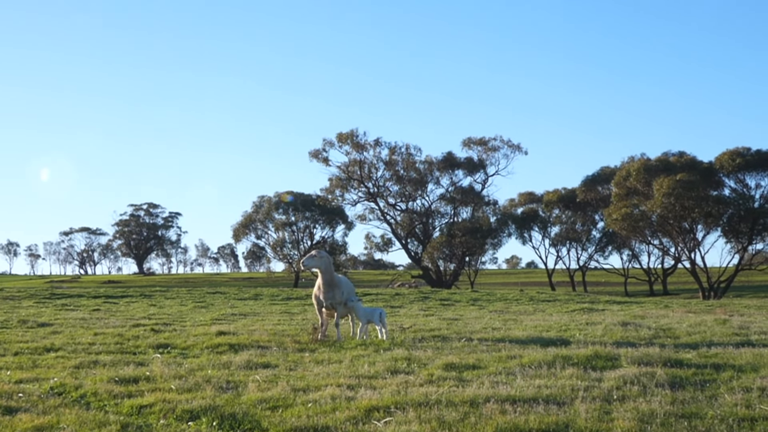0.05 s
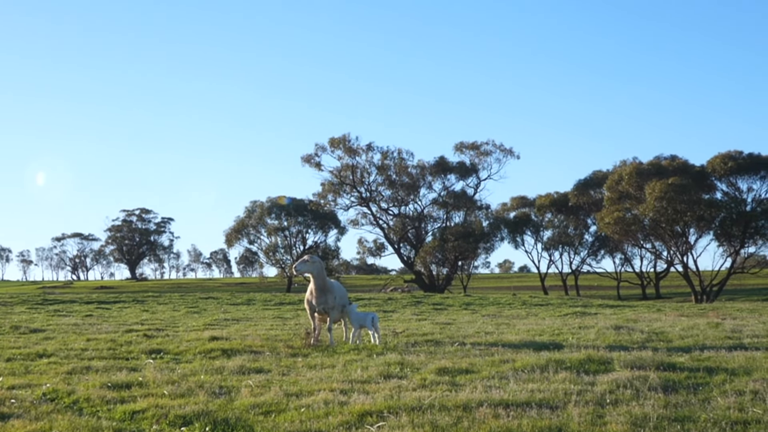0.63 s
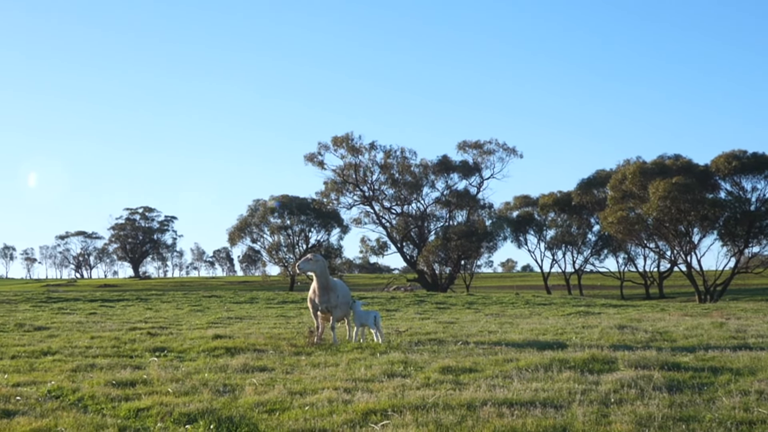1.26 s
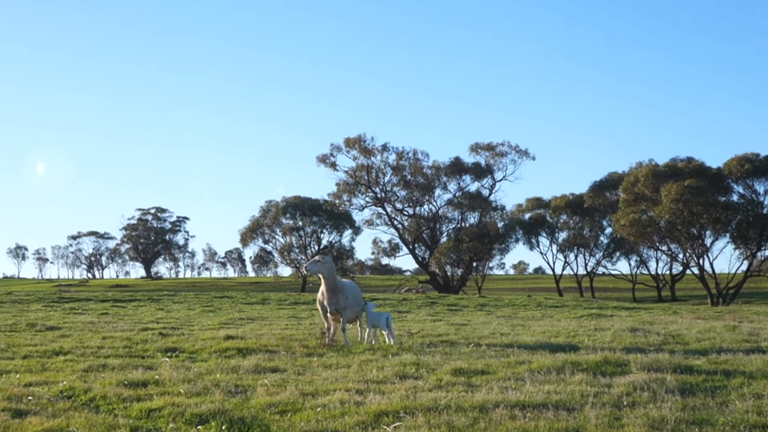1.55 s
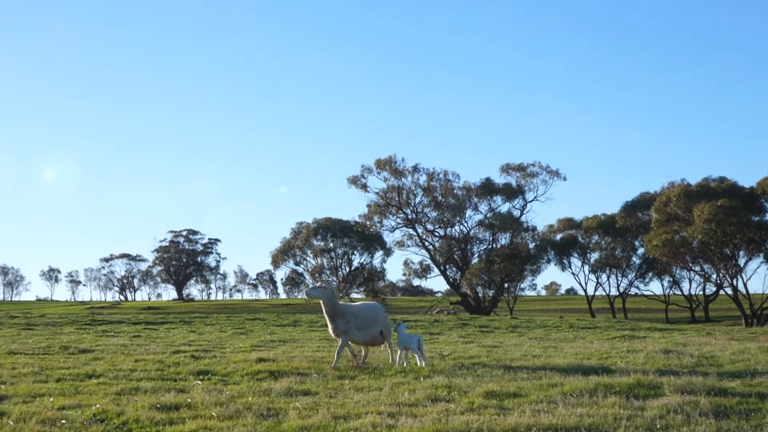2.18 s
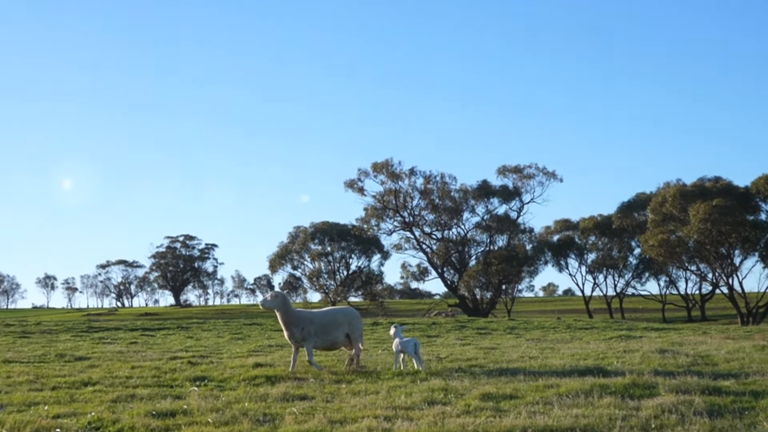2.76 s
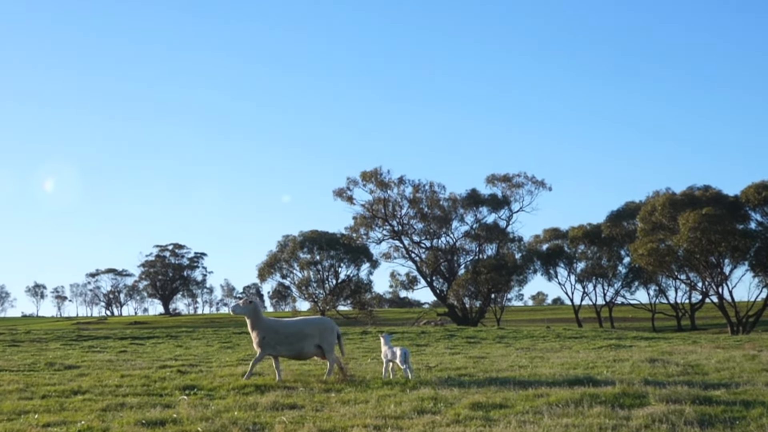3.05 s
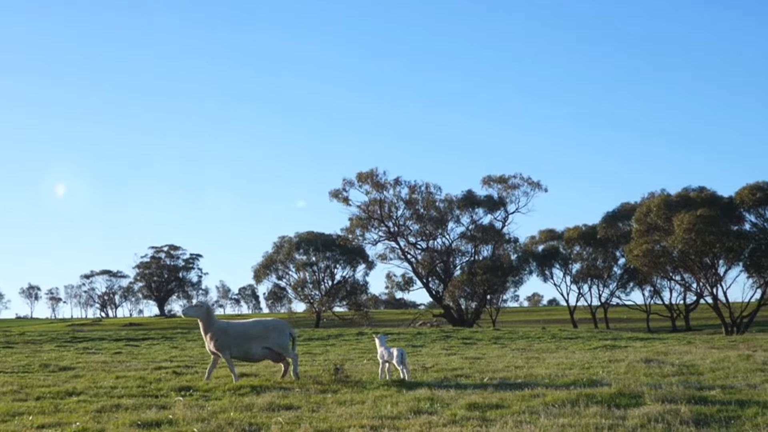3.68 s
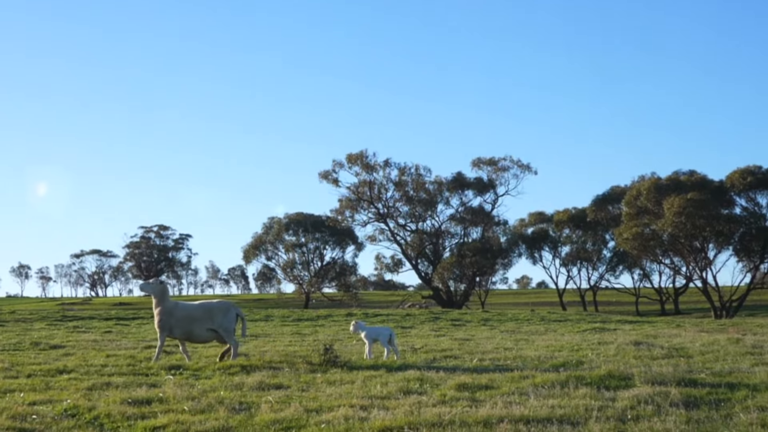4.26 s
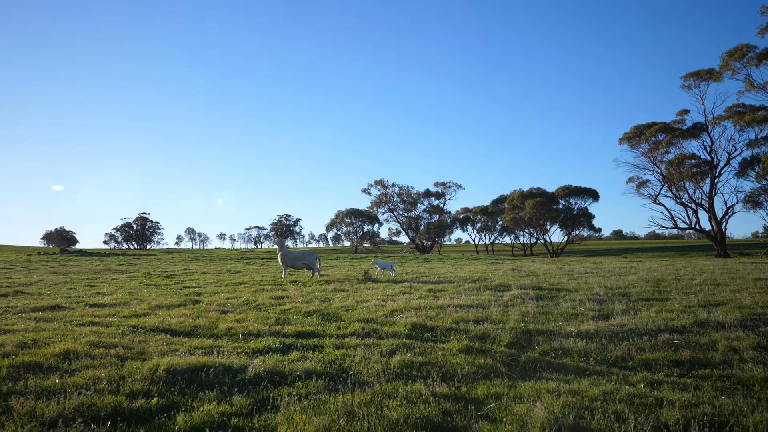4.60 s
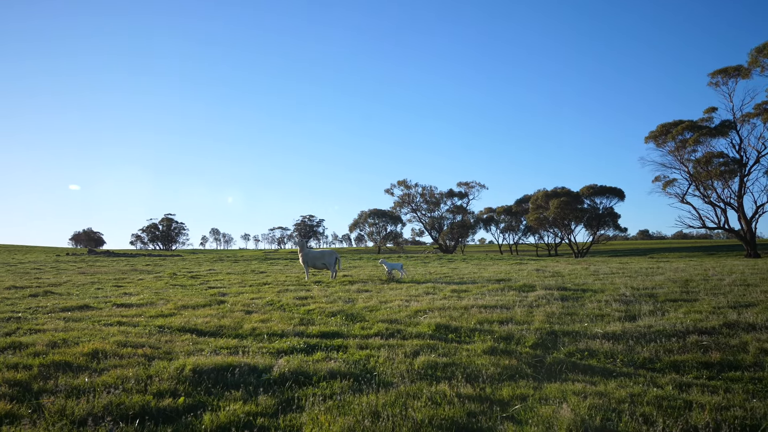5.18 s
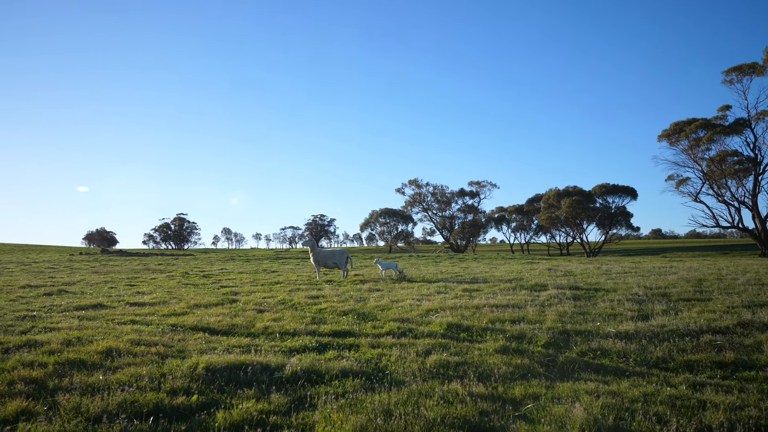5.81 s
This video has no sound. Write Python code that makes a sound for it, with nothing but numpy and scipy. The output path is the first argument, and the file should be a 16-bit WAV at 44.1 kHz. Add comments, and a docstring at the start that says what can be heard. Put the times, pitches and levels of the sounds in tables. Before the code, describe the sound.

A lamb calls faintly, a low rasping bleat follows, then a ewe gives one loud quavering bleat, with light wind on the microphone.

```python
"""Ewe and lamb in a paddock

A lamb calls thinly, a low rasping call follows, then the ewe bleats loudly. Each voice is vocal-fold
pulses ringing a throat that changes shape; squeezes of the ewe's larynx make her quaver.
Wind buffets the microphone and stirs the grass, a far bird whistles, a hand-held camera whines and clicks."""
import sys
import numpy as np
from scipy import signal
from scipy.fft import rfft, irfft
from scipy.io import wavfile

SR = 44100
rng = np.random.default_rng(int(sys.argv[2]) if len(sys.argv) > 2 else 0)


def transcribe(signal):
    """Save signal, clipped to [-1, 1], as a 16-bit WAV file at the path in sys.argv[1]."""
    frames = np.atleast_2d(signal).T
    limited = np.clip(frames, -1, 1)
    pcm = np.round(limited * 32767).astype(np.int16)
    wavfile.write(sys.argv[1], SR, pcm)


N = 266452
TIME = np.arange(N) / SR
BAND_LIMIT_HZ = 15000


def amp(db):
    """dB to gain."""
    return 10 ** (np.asarray(db) / 20)


def unit(x):
    """Scale to rms 1."""
    return x / np.sqrt(np.mean(x ** 2) + 1e-20)


def along(rows, at):
    """Table columns, interpolated linearly over the first."""
    axis, *columns = np.transpose(rows)
    return [np.interp(at, axis, column) for column in columns]


def across(points, hz):
    """Table interpolated over log frequency."""
    f, value = np.transpose(points)
    return np.interp(np.log(hz + 1), np.log(f + 1), value)


def placed(start_s, sound):
    """Full-length track with the sound at start_s."""
    return np.pad(sound, (max(round(start_s * SR), 0), N))[:N]


def panned(x, left_db):
    """Mono to stereo, left_db louder on the left."""
    return x * amp([[left_db / 2], [-left_db / 2]])


def wander(count, rate_hz):
    """Smooth random curve, rms 1, rolling off at rate_hz."""
    hz = np.fft.rfftfreq(count, 1 / SR)
    return unit(irfft(rfft(rng.standard_normal(count)) * np.exp(-(hz / rate_hz) ** 2), count))


def swells(rows):
    """Gain curve of Gaussian swells, summed in power."""
    return np.sqrt(sum((amp(db) * np.exp(-((TIME - s) / half_s) ** 2)) ** 2 for s, half_s, db in rows))


def ring(x, spectrum, size=4096):
    """Minimum-phase filter: each pulse rings after it strikes."""
    log_gain = np.log(amp(across(spectrum, abs(np.fft.fftfreq(size, 1 / SR)))))
    taps = np.fft.ifft(np.exp(np.conj(signal.hilbert(log_gain)))).real
    return signal.oaconvolve(x, taps[:size // 2])[:len(x)]


def glide(start_s, length_s, first_hz, last_hz, db, waver=0):
    """Sliding tone, faded in and out."""
    count = int(length_s * SR)
    hz = np.linspace(first_hz, last_hz, count) * (1 + waver * wander(count, 220))
    tone = np.sqrt(2) * np.sin(2 * np.pi * np.cumsum(hz) / SR)
    return placed(start_s, amp(db) * tone * signal.windows.tukey(count, .8))


# Left-right coherence: f/Hz, coherence/0-1
MIC_COHERENCE = [(30, .8), (120, .95), (500, .85), (2000, .8), (6000, .8), (9000, .72), (13000, .55)]
def noise(spectrum):
    """Coloured noise, rms 1, at two close microphones."""
    hz = np.fft.rfftfreq(N, 1 / SR)
    mid, side = rfft(rng.standard_normal((2, N))) * amp(across(spectrum, hz))
    coherence = np.clip(across(MIC_COHERENCE, hz), 0, 1)
    side = side * np.sqrt((1 - coherence) / (1 + coherence))
    return unit(irfft([mid + side, mid - side], N))


# Hiss spectrum: f/Hz, level/dB
HISS_SPECTRUM = [(30, -30), (120, -5), (260, -10), (480, -8), (720, -16), (1100, -13), (1400, -18),
                 (2500, -20), (5000, -21), (9000, -21.5), (14000, -24), (15400, -32)]
def hiss(level_db=-65.06):
    """Steady noise floor."""
    return noise(HISS_SPECTRUM) * amp(level_db)


# Breeze swells: t/s, half length/s, peak/dB
BREEZE_SWELLS = [(.85, 0.21, -70), (4.68, 0.38, -57), (5.76, 0.31, -62)]
# Rustle spectrum: f/Hz, level/dB
GRASS_SPECTRUM = [(100, -6.5), (250, -1.5), (480, 0), (750, -2.5), (1200, -1.5), (2000, -3), (3000, -11),
                  (6000, -18.5), (15000, -43)]
def grass(calm_db=-72.5):
    """Breeze swelling in the grass."""
    return noise(GRASS_SPECTRUM) * np.hypot(swells(BREEZE_SWELLS), amp(calm_db))


# Gusts: t/s, half length/s, relative peak/dB
WIND_GUSTS = [(.022, 0.019, -37), (.1, 0.081, -45.5), (.165, 0.021, -39), (.26, 0.11, -51),
              (.625, 0.011, -50.5), (.71, 0.03, -49.5), (.768, 0.034, -45), (.89, 0.036, -44),
              (.995, 0.014, -43), (1.12, 0.22, -47.5), (1.295, 0.02, -43.5), (1.44, 0.036, -51),
              (1.53, 0.025, -53), (1.82, 0.022, -52.5), (2.65, .3, -62), (4.58, .018, -52),
              (5.105, 0.027, -43.5), (5.11, 0.17, -55), (5.81, 0.086, -53)]
# Buffeting spectrum: f/Hz, level/dB
BUFFET_SPECTRUM = [(20, -43), (45, -30.5), (85, -4.5), (125, 1.5), (180, -5), (270, -25), (400, -38.5),
                   (650, -55), (1100, -89)]
# Flutter added by hard gusts: f/Hz, level/dB
FLUTTER_SPECTRUM = [(50, -28), (130, 0), (200, 9.5), (300, 0.5), (420, -24), (800, -53), (2000, -84)]
def wind(buffet_db=-1.5, flutter_db=-42, lumps_db=2.15):
    """Lumpy gusts striking the microphone, brighter when hard."""
    light_wind = amp(-65.5 + 3.2 * wander(N, rate_hz=11))
    force = np.hypot(swells(WIND_GUSTS), light_wind)
    buffet = noise(BUFFET_SPECTRUM) * force * amp(buffet_db)
    flutter = noise(FLUTTER_SPECTRUM) * amp(flutter_db) * (force / force.max()) ** 2
    lumps = amp(lumps_db * wander(N, rate_hz=30))
    return panned((buffet + flutter) * lumps, left_db=1.6)


# Motor partials: f/Hz, level/dB
WHINE_PARTIALS = [(959.5, -68), (1919, -78.5), (2878, -75.5), (4797, -81)]
# Motor envelope: t/s, gain/dB
WHINE_ENVELOPE = [(0, -11), (1.1, -8), (1.4, -5.5), (2.2, -8.5), (2.7, -3.5), (3.3, -3.5), (3.9, -10.5),
                  (4.9, -13), (6.04, -25)]
def motor_whine(drift_s=.00096, flicker_db=3.3):
    """Faint camera motor, unsteady in pitch and level."""
    motor_time = TIME + np.cumsum(drift_s * wander(N, rate_hz=20.74)) / SR
    whine = sum(amp(db) * np.sqrt(2) * np.sin(2 * np.pi * hz * motor_time) for hz, db in WHINE_PARTIALS)
    return whine * amp(along(WHINE_ENVELOPE, TIME)[0] + flicker_db * wander(N, rate_hz=30))


# Camera body modes: f/Hz, level/dB, T60/s
BODY_MODES = [(2305, -1.5, 0.0096), (3520, -1.5, 0.0023), (4800, 0.5, 0.0036), (7200, -8, 0.0034),
              (9020, -4.5, 0.0033), (11050, -4.5, 0.0031), (12450, -7.5, 0.0023)]
def click(start_s, peak_db, tilt_db_per_octave):
    """A tick rings the camera's small plastic body."""
    t = np.arange(SR // 20) / SR
    tick = 0
    for k, (hz, db, t60_s) in enumerate(BODY_MODES):
        decay = amp(db + tilt_db_per_octave * np.log2(hz) - 60 * t / t60_s)
        tick += (-1) ** k * decay * np.sin(2 * np.pi * hz * t)
    return placed(start_s, amp(peak_db) * tick / abs(tick).max())


# Body clicks: t/s, peak/dB, tilt/(dB/octave)
BODY_CLICKS = [(1.4393, -17.5, 4.5), (1.574, -45.5, -19), (3.616, -39.5, -5.5), (3.86, -31, -6)]
# Grip knock: t/s, length/s, first f/Hz, last f/Hz, level/dB
GRIP_KNOCKS = [(3.848, .018, 490, 540, -48)]
# Finger slides: t/s, half length/s, peak/dB
FINGER_SLIDES = [(1.47, 0.14, -60), (3.72, 0.16, -62)]
# Skin friction spectrum: f/Hz, level/dB
SKIN_SPECTRUM = [(500, -6.5), (2000, -1.5), (4500, -5.5), (6500, -9.5), (10000, -9), (15000, -30)]
def handling():
    """Clicks, a soft knock and fingers sliding on the camera."""
    clicks = sum(click(*row) for row in BODY_CLICKS)
    knocks = sum(glide(*row) for row in GRIP_KNOCKS)
    return clicks + knocks + noise(SKIN_SPECTRUM) * swells(FINGER_SLIDES)


# Echo decay: f/Hz, T60/s
ECHO_DECAY = [(200, 0.524), (1500, 0.62), (4000, 0.97), (10000, 0.033)]
def field_echo(x):
    """Scatter from ground and trees; the top treble dies first."""
    hz, t, bins = signal.stft(rng.standard_normal((2, SR)), SR, nperseg=256)
    decay = amp(-60 * t / across(ECHO_DECAY, hz)[:, None])
    tail = signal.istft(bins * decay, SR, nperseg=256)[1]
    return signal.fftconvolve(x[None], tail / np.linalg.norm(tail[0]), axes=1)[:, :N]


# Notes of one chirp, before random scaling: f/Hz, level/dB
CHIRP_NOTES = [(3180, -78), (4250, -77.5), (4600, -79)]
# Whistles: t/s, length/s, first f/Hz, last f/Hz, level/dB
BIRD_WHISTLES = [(1.275, .085, 3040, 3040, -64.5), (1.494, .052, 3020, 3040, -63.5),
                 (1.637, .1, 3060, 3000, -67.5), (1.733, .06, 3020, 3020, -66.5),
                 (1.862, .075, 2980, 2950, -65), (1.95, .04, 3450, 3650, -73),
                 (2.03, .11, 2890, 2810, -59.5), (5.58, .12, 3000, 3030, -69),
                 (5.765, .14, 3056, 3010, -65.5), (5.95, .092, 3050, 2980, -66.5)]
def birds(chirps=7, start_s=2.555, gap_s=.08, scatter_s=.011, chirp_s=.055):
    """Far whistles and a loose run of rough chirps from the trees."""
    late, first, last, gains = rng.uniform([-1, .94, .95, .5], [1, 1.04, 1.07, 1.3], (chirps, 4)).T
    starts_s = start_s + gap_s * np.arange(chirps) + scatter_s * late
    twitter = sum(gain * glide(s, chirp_s, hz * first_ratio, hz * last_ratio, db, waver=.017)
                  for s, first_ratio, last_ratio, gain in zip(starts_s, first, last, gains)
                  for hz, db in CHIRP_NOTES)
    return twitter + sum(glide(*row, waver=.0032) for row in BIRD_WHISTLES)


def folds(hz, rough, jitter, shimmer):
    """Vocal folds: one sharp, slightly uneven pulse and a puff of air per cycle."""
    count, mean_hz = len(hz), hz.mean()
    cycles = np.cumsum(hz * (1 + jitter * wander(count, mean_hz))) / SR
    pulses = sum(np.cos(2 * np.pi * k * cycles) for k in range(1, int(BAND_LIMIT_HZ / mean_hz)))
    puffs = (.25 + np.exp(-(cycles % 1) / .3)) * rng.standard_normal(count)
    return unit(pulses) * (1 + shimmer * wander(count, mean_hz)) + rough * unit(puffs)


def throat(drive, shapes, mouth):
    """Throat resonances, crossfaded as the mouth moves; mouth = k selects shape k."""
    return sum(np.maximum(1 - abs(mouth - k), 0) * unit(ring(drive, shape))
               for k, shape in enumerate(shapes))


def call(contour, shapes, mouth, rough, jitter):
    """Folds driving a throat, no quaver."""
    t = np.arange(contour[0][0], contour[-1][0], 1 / SR)
    db, hz = along(contour, t)
    voice = throat(folds(hz, rough, jitter, shimmer=.019), shapes, along(mouth, t)[0])
    return placed(t[0], voice * amp(db) * signal.windows.tukey(len(t), .06))


# Lamb's call: t/s, level/dB, f/Hz
LAMB_CONTOUR = [(.33, -68, 300.2), (.39, -74, 343.7), (.404, -55, 415.3), (.428, -54, 410),
                (.455, -63, 394.3), (.495, -57, 404), (.61, -51.5, 399.4), (.69, -55.5, 391),
                (.765, -61.5, 374), (.8, -77, 330)]
# Mouth: t/s, shape (0 parting, 1 open)
LAMB_OPENING = [(.33, 0), (.47, 0), (.53, .3), (.6, .85), (.7, 1), (.8, 1)]
# Throat response per shape: f/Hz, level/dB
LAMB_SHAPES = [
    [(400, -40), (800, -45), (1220, 0), (1600, -19), (2050, -17), (2480, -3), (2850, 6), (3250, -14),
     (3700, -22), (4100, -9), (4600, -30), (8000, -51)],
    [(400, -32), (800, -35), (1140, -9.5), (1215, 2), (1600, -21), (2000, -14), (2380, 0.5), (2800, -1),
     (3150, 6), (3550, -15), (4050, -15), (4800, -19), (8000, -40)],
]
def lamb_call():
    """A rising murmur, a short yelp, then a long falling note."""
    return call(LAMB_CONTOUR, LAMB_SHAPES, LAMB_OPENING, rough=.043, jitter=.0042)


# Rasping call: t/s, relative level/dB, f/Hz
RASP_CONTOUR = [(3.29, -48.5, 133.9), (3.39, -60.5, 150.8), (3.422, -49, 168.4), (3.46, -51, 155.7),
                (3.49, -42, 175.3), (3.53, -45.5, 166.3), (3.66, -45.5, 176.6), (3.794, -49.5, 168.3),
                (3.84, -64, 143.6)]
# Mouth: t/s, shape (0 open, 1 closing, silent from 2 up)
RASP_CLOSURE = [(3.29, 3), (3.42, .5), (3.5, 0.78), (3.58, 0.2), (3.64, 0.88), (3.74, 0.4), (3.81, 0.6)]
# Throat response per shape: f/Hz, level/dB
RASP_SHAPES = [
    [(170, -34), (800, -43), (1030, -7), (1400, -4), (1570, -17), (1750, 6.5), (2050, 4), (2300, -2.5),
     (2750, -2.5), (3100, -37), (6000, -45)],
    [(170, -14.5), (800, -26), (1030, -4), (1200, -4), (1400, -20.5), (1740, 6.5), (2000, -3.5), (2300, -8),
     (2650, -21.5), (3100, -35), (6000, -39)],
]
def rasping_call(gain_db=-1.34):
    """A low voice, roughened by strong puffs of air."""
    return amp(gain_db) * call(RASP_CONTOUR, RASP_SHAPES, RASP_CLOSURE, rough=.22, jitter=.006)


# Ground path delay: left/s, right/s
GROUND_DELAYS_S = (.001293, .001316)
def ground_bounce(x, gain_db=-17.5):
    """One reflection off the ground to each microphone."""
    return amp(gain_db) * np.array([placed(s, x) for s in GROUND_DELAYS_S])


# Ewe, left over right: f/Hz, level/dB
EWE_LEFT_DB = [(60, 1.0), (150, 1.0), (380, 0.0), (950, -3.2), (2380, -0.67), (5970, 1), (15000, -2.3)]
# Ewe, left lead: f/Hz, phase/rad
EWE_LEFT_RAD = [(0, -0.1), (10700, 0.048), (11000, 0.1), (11400, -0.1), (13500, 0.2), (13900, -0.0021),
                (15200, -0.0)]
def ewe_at_mics(x):
    """Direct path to two close microphones, slightly apart in level and phase."""
    hz = np.fft.rfftfreq(N, 1 / SR)
    left = amp(across(EWE_LEFT_DB, hz) / 2) * np.exp(.5j * across(EWE_LEFT_RAD, hz))
    return irfft(rfft(x) * np.array([left, 1 / left]), N)


def quaver(t, count=21, start_s=3.992, gap_s=.0371, slowing_s=.00065, lift_hz=15.5):
    """Pitch lift in Hz from a slowing train of larynx squeezes; the folds slacken after each."""
    k = np.arange(count)
    times_s = start_s + gap_s * k + slowing_s * k * (k - 1) / 2
    strength = np.where(k % 2, 1, np.interp(times_s, (4.1, 4.42), [0, 1]))  # every second one fades in
    since_s = t - times_s[:, None]
    squeeze = np.exp(-(since_s / .013) ** 2)
    slack = .15 * np.exp(-((since_s - .018) / .008) ** 2)
    return lift_hz * strength @ (squeeze - slack)


# Breath spectrum: f/Hz, level/dB
BREATH_SPECTRUM = [(2500, -45), (5200, 5.5), (6000, -7), (7000, -9.5), (8000, -1), (8900, -5), (9600, -2.5),
                   (11000, -6.5), (12400, -10.5), (13500, -20.5), (15000, -26)]
# Breath against voice: t/s, level/dB
BREATH_ENVELOPE = [(3.91, -12.5), (4.04, -23), (4.2, -25), (4.33, -22), (4.45, -19), (4.58, -22),
                   (4.75, -28), (4.91, -29.5)]
def breath(t, drive, buzz_db=-3, flicker_db=.67):
    """Turbulence in the ewe's mouth, buzzing with the folds."""
    turbulence = rng.standard_normal(len(t)) + amp(buzz_db) * drive
    rush = ring(turbulence, BREATH_SPECTRUM) * amp(flicker_db * wander(len(t), rate_hz=120))
    return unit(rush) * amp(along(BREATH_ENVELOPE, t)[0])


# Pitch arch under the quaver, dropping as breath runs out: t/s, f/Hz
EWE_ARCH = [(3.91, 231), (3.995, 305), (4.08, 328), (4.32, 336), (4.5, 329), (4.64, 315), (4.765, 300),
            (4.79, 280), (4.91, 273)]
# Effort: t/s, level/dB
EWE_ENVELOPE = [(3.911, -58), (3.947, -53), (3.963, -50), (4.032, -35.5), (4.049, -39), (4.119, -29),
                (4.17, -28), (4.44, -29), (4.62, -33.5), (4.78, -37.5), (4.882, -42.5), (4.909, -61)]
# Slack folds hoarse, taut folds clear: f/Hz, roughness/0-1
EWE_ROUGHNESS = [(272, .17), (310, .06), (330, .045)]
# Mouth: t/s, shape (0 shut, 1 parting, 2 wide, 3 narrowing)
EWE_MOUTH_SHAPE = [(3.91, 0), (3.948, .02), (3.962, .7), (4, 1), (4.04, 1), (4.17, 2), (4.47, 2), (4.7, 3),
                   (4.91, 3)]
# Throat response per shape: f/Hz, level/dB
THROAT_SHUT = [(120, -20), (260, 0), (520, 0), (750, -22), (1150, -12), (1800, -14), (2300, -22),
               (4000, -20), (6000, -34), (15000, -50)]
THROAT_PARTING = [(120, -49), (200, -20), (332, -9), (512, -26.5), (1110, -22.5), (1240, -5), (2380, -11.5),
                  (2800, 9.5), (3350, -1), (3940, 9), (5360, -25), (5970, -24), (10100, -24), (15000, -47)]
THROAT_WIDE = [(150, -24), (335, -26), (680, -45.5), (1020, -28.5), (1400, -7), (1620, -12), (2400, -14),
               (2760, -8), (3040, 0), (3330, -1.5), (3650, -6.5), (3880, -3), (4150, -6), (5200, -30),
               (6000, -40), (9700, -31.5), (15000, -85.5)]
THROAT_NARROWING = [(150, -41), (310, -15), (700, -42), (950, -23), (1250, -7.5), (1520, 0.5), (1850, -5.5),
                    (2300, -11.5), (2750, -13.5), (3150, 4.5), (3550, -2.5), (4020, 5), (5350, -15.5),
                    (6200, -29.5), (10000, -55), (15000, -52)]
def ewe_bleat(swell_lag_s=.003, swell_knee_hz=26, tremble_db=.45):
    """Loud bleat: about 23 squeezes a second lift pitch and level as the mouth opens and narrows."""
    t = np.arange(EWE_ENVELOPE[0][0], EWE_ENVELOPE[-1][0], 1 / SR)
    lift_hz = quaver(t)
    swell_db = 7.5 * np.tanh(np.interp(t - swell_lag_s, t, lift_hz) / swell_knee_hz)
    gain = amp(along(EWE_ENVELOPE, t)[0] + swell_db + tremble_db * wander(len(t), rate_hz=40))
    pitch_hz, = along(EWE_ARCH, t)
    rough, = along(EWE_ROUGHNESS, pitch_hz)
    release = np.maximum(-np.gradient(lift_hz), 0)  # folds lose their beat as a squeeze lets go
    jitter = .0012 + .06 * rough + .008 * (release / release.max()) ** 4
    drive = folds(pitch_hz + lift_hz, rough, jitter, shimmer=.06)
    shapes = [THROAT_SHUT, THROAT_PARTING, THROAT_WIDE, THROAT_NARROWING]
    voice = throat(drive, shapes, along(EWE_MOUTH_SHAPE, t)[0])
    return placed(t[0], gain * (voice + breath(t, drive)))


def scene():
    """Animals, reflections, air and camera in stereo."""
    ewe, far_birds, lamb, rasp = ewe_bleat(), birds(), lamb_call(), rasping_call()
    direct = ewe_at_mics(ewe) + panned(lamb + rasp, left_db=7) + far_birds
    echo = field_echo(amp(-32) * ewe + amp(-17) * (lamb + rasp) + amp(-7) * far_birds)
    background = wind() + grass() + hiss() + motor_whine() + handling()
    return background + echo + ground_bounce(ewe) + direct


def record(dry):
    """The camera's band limit."""
    lowpass = signal.firwin(511, BAND_LIMIT_HZ, window=("kaiser", 9), fs=SR)
    return signal.oaconvolve(dry, lowpass[None], "same")


dry = scene()
out = record(dry)
transcribe(out)
```